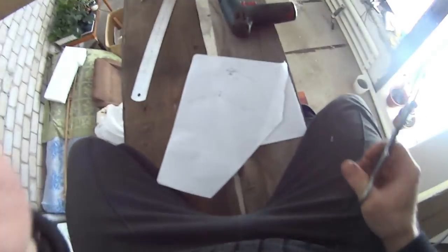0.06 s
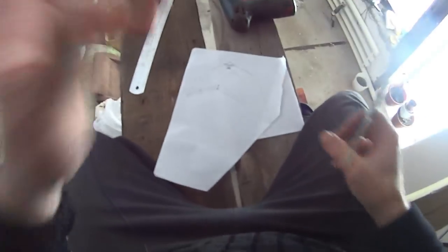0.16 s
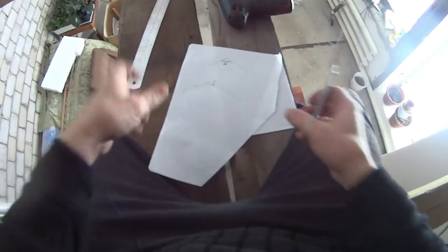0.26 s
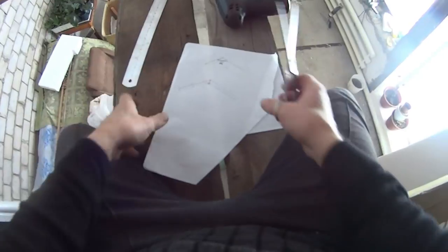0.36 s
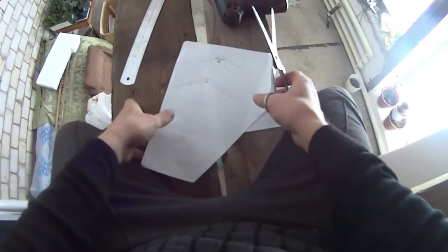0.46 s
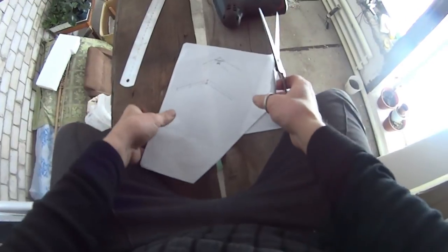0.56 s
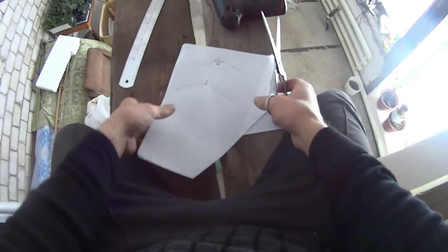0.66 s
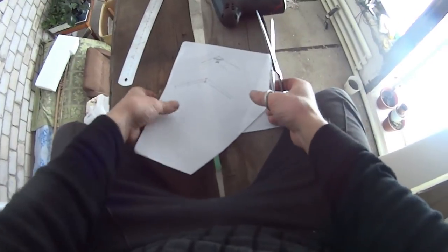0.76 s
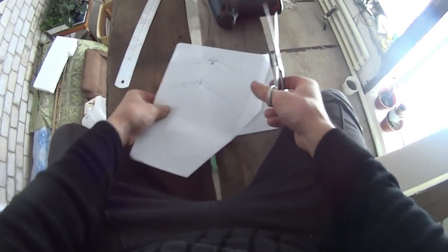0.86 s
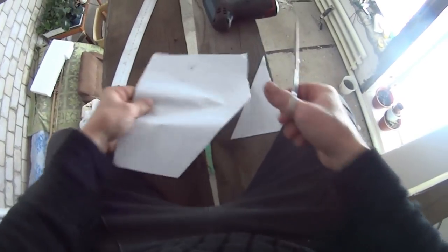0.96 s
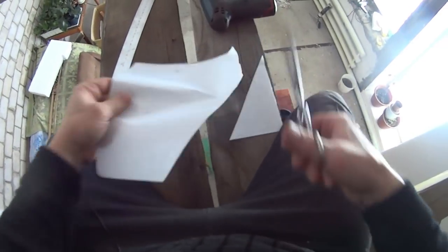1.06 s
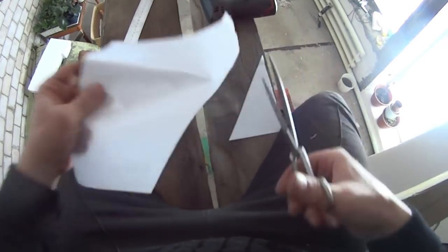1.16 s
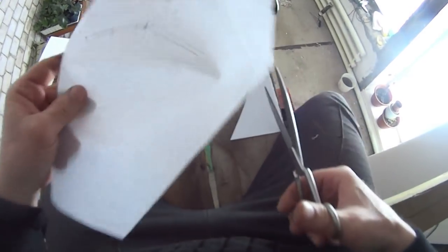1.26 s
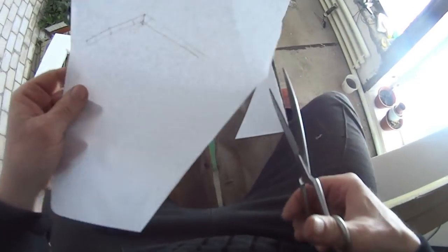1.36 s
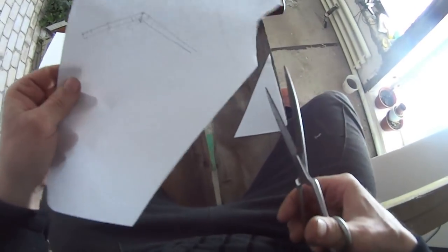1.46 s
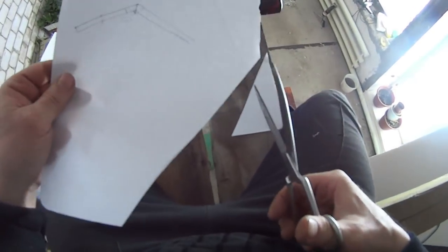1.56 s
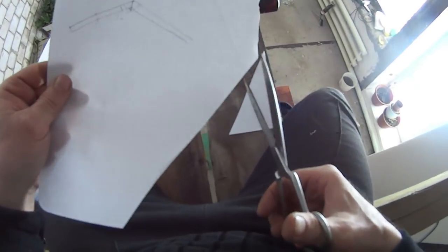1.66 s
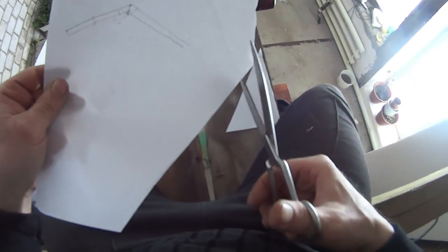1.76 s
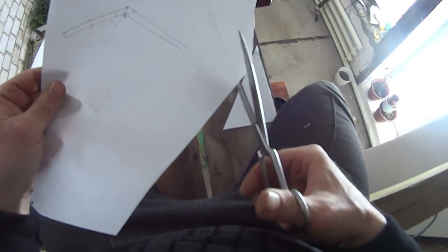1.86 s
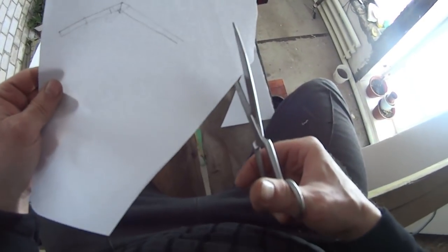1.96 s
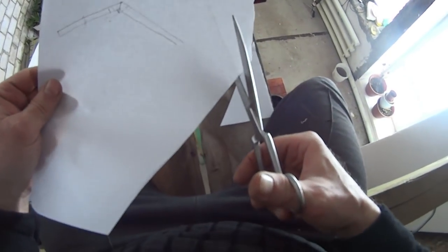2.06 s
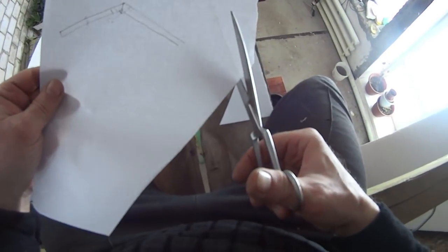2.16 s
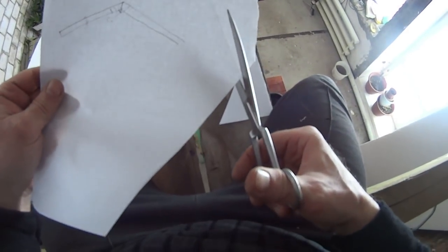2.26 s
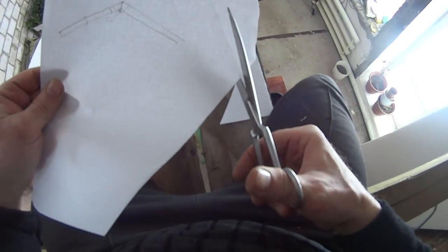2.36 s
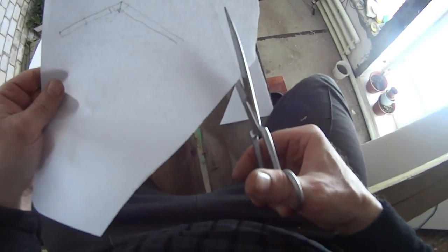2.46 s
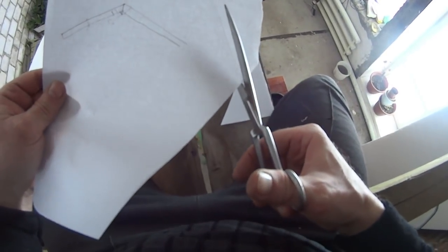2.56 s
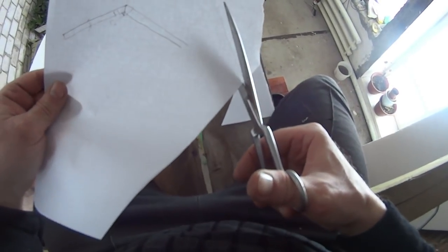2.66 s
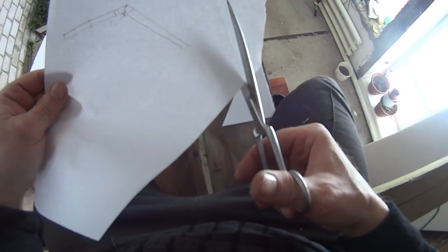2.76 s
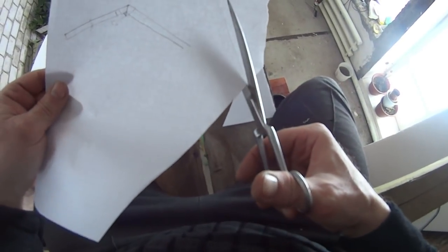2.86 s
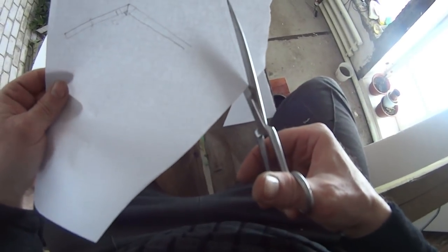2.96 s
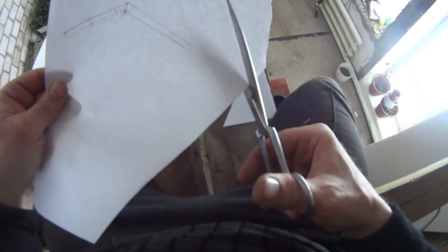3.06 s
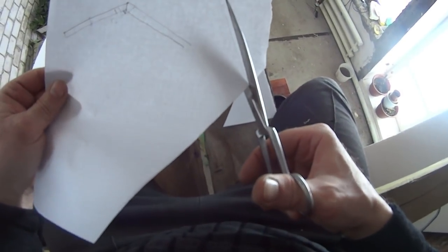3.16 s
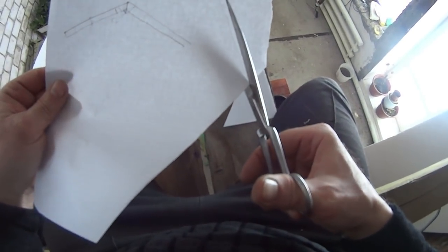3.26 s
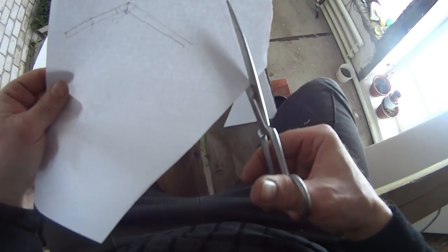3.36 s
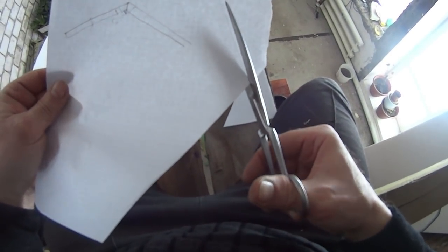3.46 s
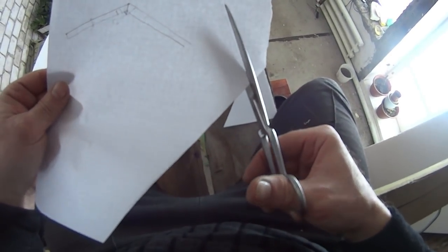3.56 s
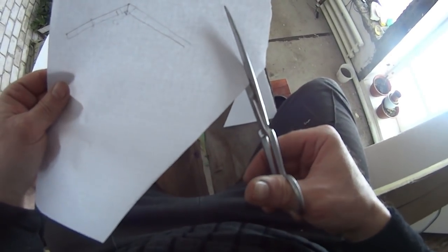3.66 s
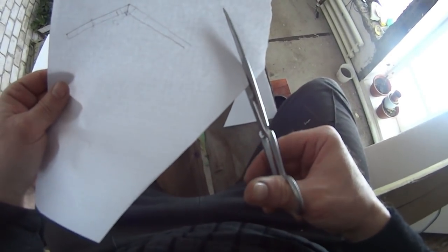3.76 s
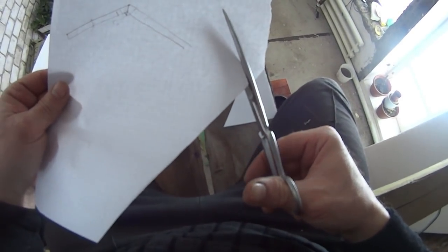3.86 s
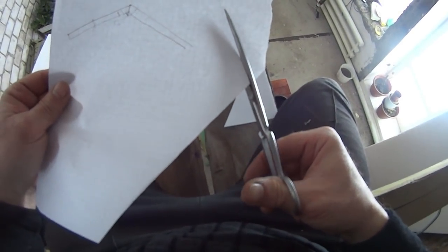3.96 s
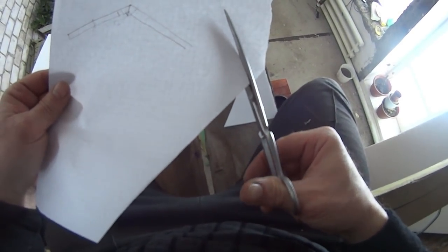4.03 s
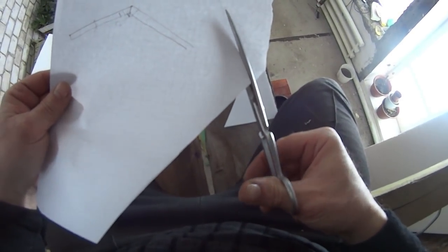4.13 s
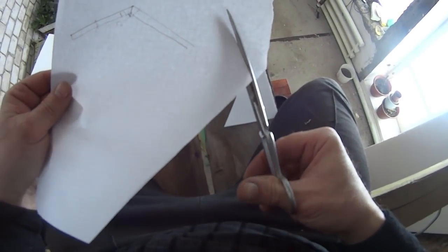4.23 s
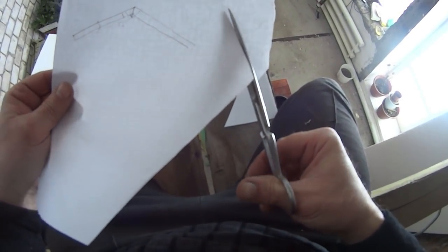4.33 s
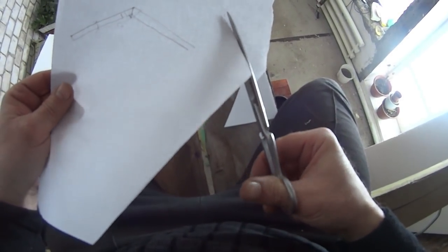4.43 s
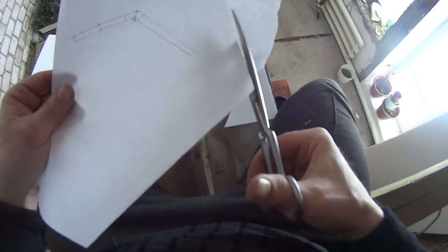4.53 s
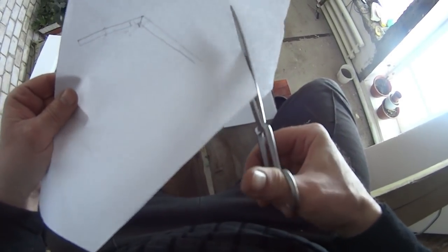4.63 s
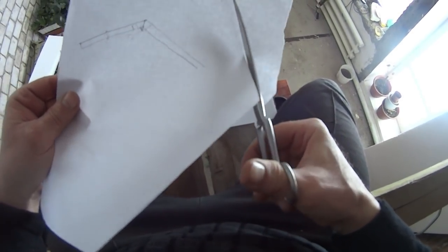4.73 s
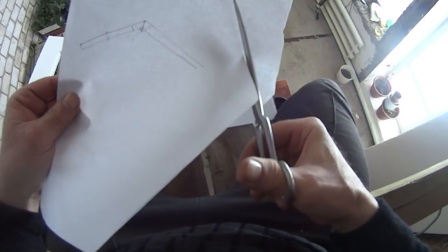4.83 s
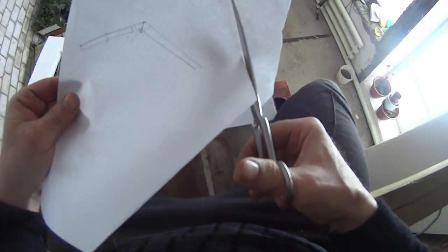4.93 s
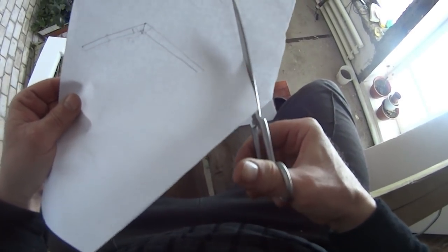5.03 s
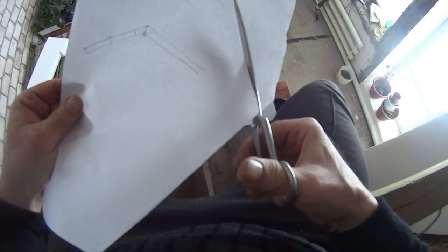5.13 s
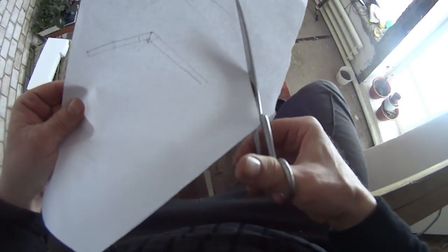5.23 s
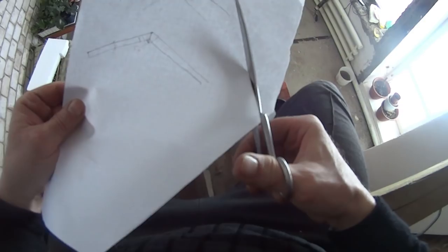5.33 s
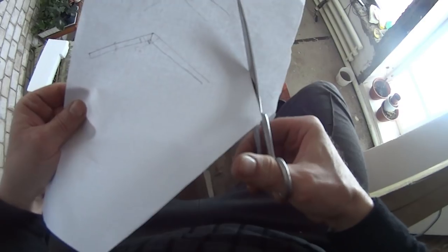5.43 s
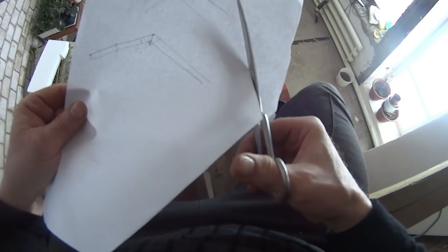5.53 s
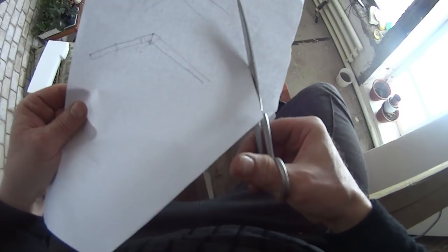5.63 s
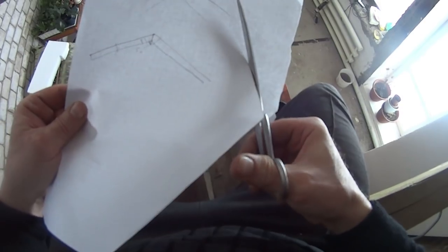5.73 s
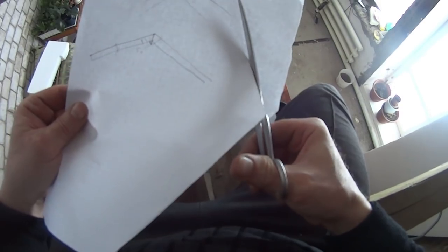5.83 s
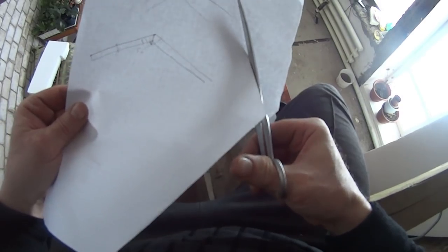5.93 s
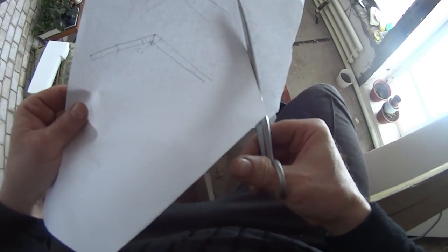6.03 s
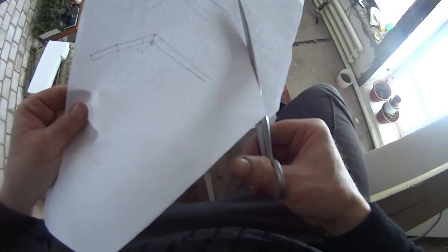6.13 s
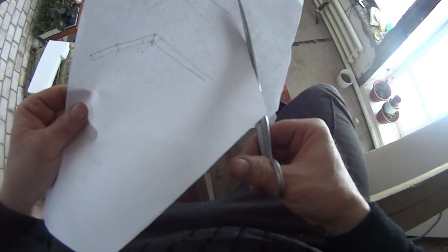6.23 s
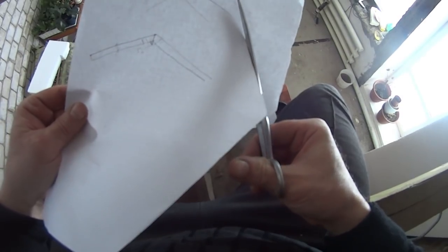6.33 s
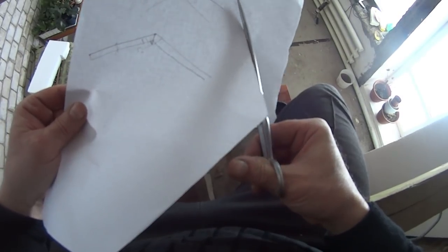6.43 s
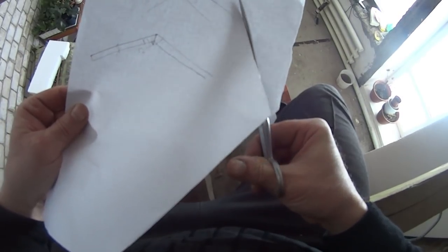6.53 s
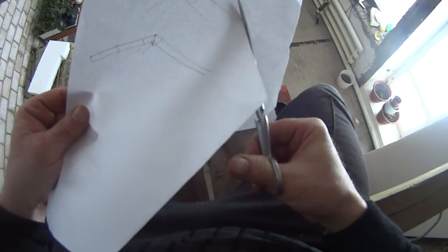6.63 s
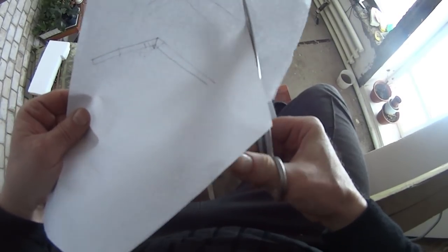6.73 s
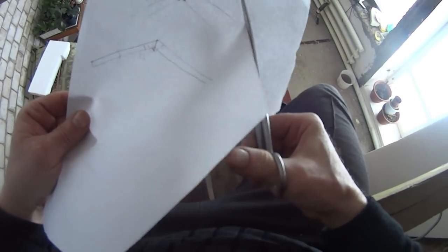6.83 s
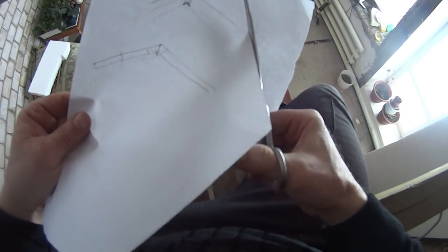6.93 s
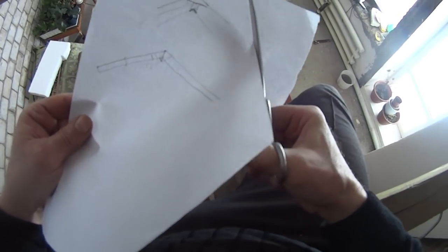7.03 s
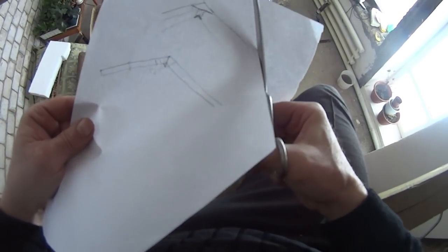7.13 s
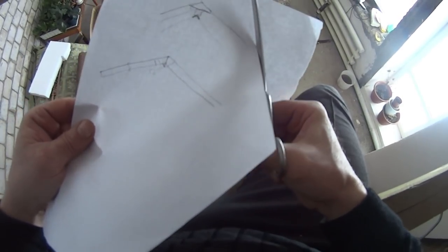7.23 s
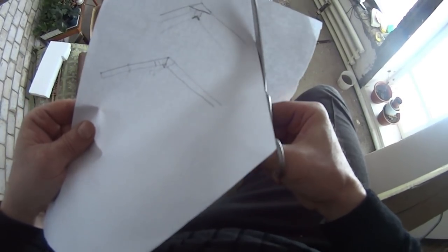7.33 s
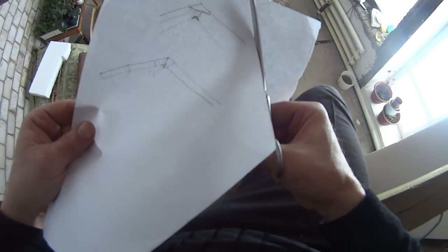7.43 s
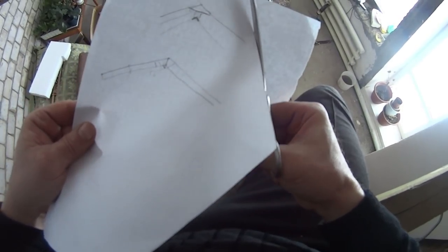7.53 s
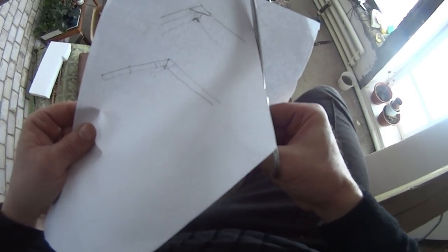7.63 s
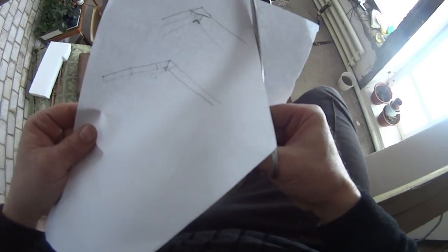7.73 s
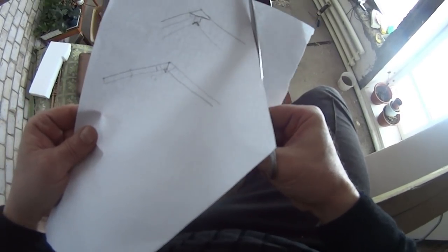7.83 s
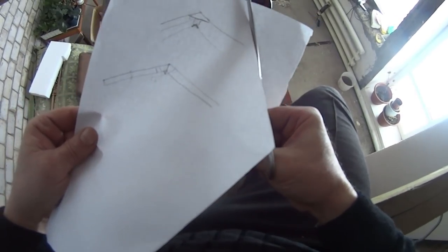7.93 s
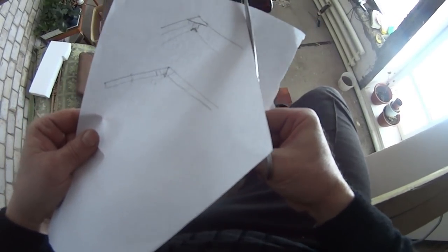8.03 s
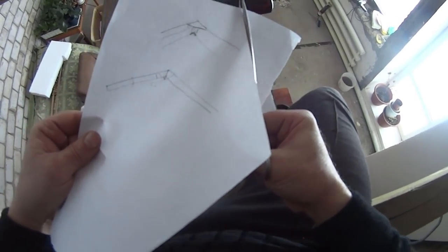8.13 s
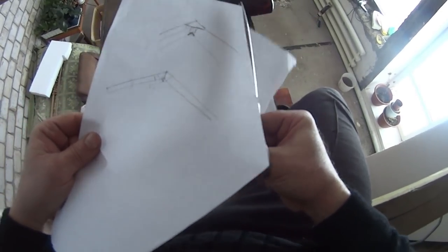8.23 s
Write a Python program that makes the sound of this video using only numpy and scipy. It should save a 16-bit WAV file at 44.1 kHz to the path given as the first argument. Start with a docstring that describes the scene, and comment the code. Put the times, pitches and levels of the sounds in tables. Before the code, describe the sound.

A sheet of paper is picked up with a quick rustle, then cut in slow, crackly scissor strokes over very faint outdoor hiss.

```python
"""On a sheltered porch, scissors creep through a hand-held sheet of paper close to a two-port microphone. A low
hum, the tail of an earlier sound, dies away as a knuckle knocks the housing (ringing modes); the sheet is
lifted off the table and rustles (random fibre clicks through paper resonances). The blades part the fibres in
stick-slip bursts, flips of the sheet hum (dying tones), and once the blades squeal (uneven chatter ringing
them), sinking into a low hum as it ends. Sparse echoes follow, and faint outdoor wash (shaped noise) lies under
it all."""
import sys
import numpy as np
from scipy import signal
from scipy.fft import rfft, irfft, next_fast_len
from scipy.io import wavfile
from scipy.ndimage import uniform_filter1d

SR = 44100
rng = np.random.default_rng(int(sys.argv[2]) if len(sys.argv) > 2 else 0)


def digitize_waveform(pressure):
    """Quantize a signal to 16-bit integers and store it at the path in sys.argv[1].

    Rows of a 2-D input are taken as channels; values are limited to [-1, 1].
    """
    field = np.atleast_2d(pressure).T
    bounded = np.clip(field, -1, 1)
    quanta = np.round(bounded * 32767).astype(np.int16)
    wavfile.write(sys.argv[1], SR, quanta)


def to_linear_factor(level_db):
    """Convert decibel levels (scalar or array-like) to linear amplitude factors."""
    exponent = np.asarray(level_db, float) / 20
    return 10 ** exponent


N = 365412  # samples

# Relative colour of the outdoor wash: [pitch_hz, density_db]
WASH_COLOUR = [(25, -7), (212, -6), (303, 4), (362, -1.5), (603, 0.5), (685, -8.5), (1140, -8),
               (6280, -17.5), (11000, -21.5)]
WASH_DB = -54.5  # rms of the wash as it enters the mix
# Likeness of the wash at the two ports: [pitch_hz, correlation]
WASH_LIKENESS = [(60, 0.92), (340, 0.64), (1890, -0.72), (10600, 0.61)]

# Phase by which the left port leads for a near source: [pitch_hz, lead_rad]
PORT_LEAD = [(100, -.3), (700, -.75), (1500, -.3), (5000, 0)]
# Level of the left port over the right: [pitch_hz, tilt_db]
PORT_TILT = [(40, 1), (500, -3), (1300, -.3)]

# Touches on the housing: [start_s, drive_db, contact_ms]
KNOCKS = [(0.0287, -29, 2.8), (0.0357, -25.5, 0.12), (0.0386, -11, 0.36)]
# Ringing modes of the housing: [pitch_hz, left_db, right_db, t60_s]
HOUSING_MODES = [(210, -12, -30, 0.021), (373, 6.5, 1, 0.0108), (470, -14, -7.5, 0.052),
                 (722, -29, -27, 0.15), (1020, -5, 1, 0.023), (1370, -14, -10.5, 0.057),
                 (1800, 4, -5.5, 0.013), (3870, 2.5, -26, 0.0019)]

# Low dying hums: the first is the tail of an earlier sound, the one at 6.747 s is the squeal sinking low as it
# ends, # the others are flips of the sheet: [start_s, level_db, pitch_hz]
HUMS = [(0.0005, -34, 707), (1.619, -29.5, 434), (4.545, -31.5, 1003), (5.178, -31, 406),
        (6.747, -24.5, 630), (7.996, -25, 514), (8.231, -25.5, 428)]
HUM_RISE_S, HUM_T60_S = 0.0013, 0.067

# Resonances of the squealing blades; the first pitch also sets the chatter: [pitch_hz, width_hz, level_db]
BLADE_MODES = [(1037, 400, 2), (1610, 270, -8), (2190, 280, -6.5), (2560, 98, 2)]
SQUEAL_S, SQUEAL_DB, SQUEAL_HOLD_S = 6.731, -23, 0.017  # start, level and length of the loudest moment
SQUEAL_RISE_DB_PER_S, SQUEAL_FALL_DB_PER_S = 750.5, 1900

# In the paper tables boom_db is relative to level_db, and treble_db tilts the balance of treble over mids;
# bands() trims all three.
# Resonances of paper and blades: [pitch_hz, width_hz, level_db]
SHEET_MODES = [(419, 66, 5.5), (578, 96, -4), (938, 92, -1), (1700, 89, -7.5), (2730, 490, -7),
               (3760, 280, -7.5), (5700, 1300, -18.5), (7600, 800, -28.5)]
SHEET_SHIFT = 0.047  # share by which these resonances sink or rise as the sheet bends
# Relative broad colour of tearing fibres: [pitch_hz, density_db]
FIBRE_COLOUR = [(40, -27), (120, -19), (250, -15), (560, -3.5), (1300, -23), (4800, -31.5), (11000, -34)]
# Clear slips of the blades through the fibres: [centre_s, level_db, length_ms]
SLIPS = [(0.98, -38.5, 6.3), (1.391, -46, 12), (1.49, -37, 9.5), (3.452, -48, 8.3), (3.486, -51, 20),
         (3.522, -54, 6.2), (3.573, -54, 11), (3.633, -56, 7.6), (3.699, -46.5, 10), (3.801, -51.5, 12),
         (3.882, -45.5, 6.7), (3.922, -51, 7.8), (3.972, -46, 6.6), (4.089, -48, 5), (4.267, -40, 6.7),
         (4.291, -41.5, 11.4), (4.314, -36, 12), (5.049, -43.5, 29.7), (5.542, -56.5, 24),
         (5.745, -57, 9.1), (5.795, -48, 6.6), (5.836, -47.5, 21), (5.932, -48, 8), (5.966, -43.5, 16),
         (5.992, -44.5, 13), (6.013, -48.5, 14), (6.078, -40, 12.3), (6.119, -53, 6.6), (6.146, -46.5, 7),
         (6.289, -46.5, 12.5), (6.358, -49.5, 6.7), (6.471, -35, 18.5), (6.505, -37, 28), (7.344, -50, 5.4),
         (7.376, -58, 4.6), (7.402, -47.5, 11), (7.438, -47, 13), (7.471, -49, 15), (7.514, -47, 29),
         (7.552, -50, 9), (7.592, -42, 8.9), (7.618, -43.5, 12), (7.642, -46, 6.8), (7.699, -42, 10.6),
         (7.749, -44, 6.9), (7.782, -45, 27), (7.848, -48, 16), (7.875, -51, 5.5), (7.915, -48, 6),
         (7.935, -43, 24), (7.996, -37.5, 15.3), (8.064, -40, 4.8), (8.106, -40.5, 18.2),
         (8.148, -41.5, 26), (8.18, -39.5, 12), (8.203, -31, 15)]
SLIP_BOOM_DB = -6
# Creases and fibres that let go at one stroke: [start_s, level_db, boom_db, treble_db]
SNAPS = [(0.9215, -24.5, -13, -8), (0.9523, -34, -17, -8), (1.0175, -37, -5, -1), (1.2936, -30, -7.5, -13),
         (3.099, -51.5, 8, -20), (3.5417, -43, -1.5, -4), (3.678, -36, -7.5, -1.5), (4.6448, -29.5, 3, -15),
         (6.4289, -35, -0.5, -6), (6.6293, -35, 8.5, -12), (6.686, -40.5, -1, -5), (6.8571, -43.5, 4, -16),
         (7.4855, -29.5, -21, 1), (7.583, -38, 0, 1), (7.669, -34, -3, 4), (7.7224, -34, 1.5, 2.5)]
# Single tough fibres that part cleanly, with no after-crackle: [start_s, level_db, treble_db]
TICKS = [(0.292, -51, -23), (1.9643, -48, 10), (2.7634, -42, 5), (3.344, -48, -4), (3.684, -45, 2),
         (3.9011, -39, -23.5), (5.0839, -34.5, -17.5), (6.7488, -35, 6), (7.343, -38, 5),
         (7.8274, -32.5, 6), (7.95, -38, 6), (8.249, -31, 4)]
# Fingers and blades dragging over the sheet: [start_s, length_s, level_db, boom_db, treble_db]
RUBS = [(0.003, 0.048, -38.5, -8, -8.5), (0.506, 0.049, -52.5, -7.5, 7), (0.737, 0.095, -53.5, 0.5, 9),
        (0.83, 0.14, -45.5, -1.5, -1.5), (0.9, 0.13, -40.5, -8.5, -0.5), (1.012, 0.053, -42, -7, -4.5),
        (1.085, 0.11, -45.5, -17, 2.5), (1.225, 0.19, -47, -2.5, 1), (1.36, 0.15, -48.5, 4.5, -17),
        (1.55, 0.037, -50, 6, -31), (1.592, 0.02, -56, 10, -28), (1.44, 0.28, -58, 14, -7),
        (4.14, 0.14, -50.5, -14, 1), (4.21, 0.16, -44.5, -1.5, -7), (4.523, 0.07, -38, -3, 0),
        (4.592, 0.058, -40, -3.5, -1.5), (4.64, 0.11, -38, 2.5, -6), (4.785, 0.028, -40, 1.5, -3),
        (5.172, 0.057, -40.5, 3.5, -9.5), (5.235, 0.076, -56.5, 4, -14), (6.704, 0.064, -34.5, -8, -6),
        (6.755, 0.082, -53, 9, -16), (6.858, 0.074, -38.5, -4.5, -4.5), (6.945, 0.15, -42, -6.5, -4),
        (7.04, 0.06, -41.5, -4.5, 1), (7.1, 0.09, -45.5, -3, -5.5), (7.188, 0.025, -43.5, 4, -2.5)]
# Slow closing, where the blades stick and slip: [start_s, length_s, level_db, boom_db, treble_db]
CUTS = [(3.245, 0.5, -54, -4, -4), (3.72, 0.42, -60.5, -5, 2.5), (5.52, 0.43, -56.5, 2, -2),
        (5.88, 0.98, -60, 4, 0.5), (7.23, 0.35, -50, -8, 0), (7.58, 0.53, -62, 1, 7)]
GRIP_S, ARCH_DB, LET_GO_DB_PER_S = 0.0035, 6.5, 550  # a drag catches fast, swells to its middle, dies away
HELD_DB, HELD_BOOM_DB, HELD_TREBLE_DB = -63.5, 1.5, -7  # the sheet merely held

EDGE_HZ = 11030  # upper band limit


def evened(x):
    """Scales to rms 1."""
    return x / np.sqrt(np.mean(x ** 2) + 1e-20)


def read(points, hz):
    """Looks a table up on a log-frequency axis."""
    f, value = np.transpose(points)
    return np.interp(np.log(hz + 1), np.log(f + 1), value)


def causal(gain):
    """Minimum-phase impulse response of a gain given on rfft bins."""
    log_gain = np.log(np.maximum(np.r_[gain, gain[-2:0:-1]], 1e-4))
    return np.fft.ifft(np.exp(np.conj(signal.hilbert(log_gain)))).real[:2048]


def ringing(hz, t60, t):
    """One dying mode."""
    return np.sin(2 * np.pi * hz * t) * to_linear_factor(-60 * t / t60)


def wash():
    """Distant outdoor noise with drifting patches, partly alike at the two ports."""
    frames, hz = N // 256 + 5, np.fft.rfftfreq(1024, 1 / SR)
    a, b, c, d, patches = rng.standard_normal((frames, 513, 5)).T
    patches = evened(uniform_filter1d(uniform_filter1d(patches, 10, 0), 10, 1))
    likeness = np.clip(read(WASH_LIKENESS, hz), -1, 1)[:, None]
    left = a + 1j * b
    right = likeness * left + np.sqrt(1 - likeness ** 2) * (c + 1j * d)
    drift_db = 3 * patches / (1 + hz[:, None] / 1200)  # the far hiss is steadier than the low wash
    spectra = np.array([left, right]) * to_linear_factor(read(WASH_COLOUR, hz)[:, None] + drift_db)
    noise = signal.istft(spectra, nperseg=1024, noverlap=768)[1][:, :N]
    return to_linear_factor(WASH_DB) * evened(noise)


def porch(x):
    """Sparse echoes off table, wall and body, other ones at each port; patterns slowly, steadily trade places."""
    t, out = np.arange(3000) / SR, np.zeros((2, N))
    turn = 3.498 * np.arange(N) / SR  # radians
    for k in range(3):
        hits = rng.random((2, len(t))) < 2500 / SR
        taps = hits * rng.standard_normal((2, len(t))) * to_linear_factor(-60 * t / 0.027)
        taps /= np.linalg.norm(taps, axis=1, keepdims=True)
        share = np.cos(turn + k * np.pi / 3) / np.sqrt(1.5)
        out += signal.oaconvolve((x * share)[None], taps, axes=1)[:, :N]
    return out


def ports(x):
    """The two ports hear a near source with a phase lead and a tilt that depend on pitch."""
    size = next_fast_len(N + 4096)
    hz = np.fft.rfftfreq(size, 1 / SR)
    half = to_linear_factor(read(PORT_TILT, hz) / 2) * np.exp(.5j * read(PORT_LEAD, hz))
    return irfft(rfft(x, size) * np.array([half, 1 / half]), size)[:, :N]


def knock():
    """A soft touch, a tick, then a rap ring the housing's modes and reach the right port first."""
    t, out = np.arange(4000) / SR, np.zeros((2, N))
    for channel, late_s in enumerate([.0003, 0]):
        ring = -sum(to_linear_factor(row[1 + channel]) * ringing(row[0], row[3], t) for row in HOUSING_MODES)
        for start_s, drive_db, contact_ms in KNOCKS:
            contact = signal.windows.hann(int(contact_ms * SR / 1000) + 3)
            rap = np.convolve(ring, contact / contact.sum())
            out[channel, round((start_s + late_s) * SR):][:len(rap)] += to_linear_factor(drive_db) * rap
    return out


def hums():
    """Each low hum swells fast, wobbles around its pitch and rings out."""
    t, out = np.arange(5000) / SR, np.zeros(N + len(HUMS) + SR)
    for start_s, level_db, pitch_hz in HUMS:
        wobble = np.cumsum(rng.standard_normal(len(t))) * .06  # radians
        phase = 2 * np.pi * pitch_hz * t + uniform_filter1d(wobble, size=150)
        swell = np.minimum(t / HUM_RISE_S, 1) * to_linear_factor(level_db - 60 * t / HUM_T60_S)
        out[round(start_s * SR):][:len(t)] += swell * np.sin(phase)
    return out[:N]


def squeal():
    """The edges chatter unevenly about a thousand times a second and ring the blades."""
    t = np.arange(-.018, .035, 1 / SR)  # zero where the loudest moment starts
    rise_db = SQUEAL_RISE_DB_PER_S * np.minimum(t, 0)
    fall_db = SQUEAL_FALL_DB_PER_S * np.maximum(t - SQUEAL_HOLD_S, 0)
    unevenness = 0.9 * uniform_filter1d(rng.standard_normal(len(t)), 60)
    turns = np.cumsum(BLADE_MODES[0][0] * (1 + unevenness)) / SR
    catches = np.diff(np.floor(turns), prepend=0) - np.gradient(turns)  # no steady push remains
    chatter = catches + 0.051 * rng.standard_normal(len(t))
    ring = sum(to_linear_factor(db) * width * ringing(hz, 2.2 / width, t - t[0]) for hz, width, db in BLADE_MODES)
    tone = evened(signal.oaconvolve(chatter, ring)[:len(t)])
    out = np.zeros(N)
    out[round((SQUEAL_S + t[0]) * SR):][:len(t)] = tone * to_linear_factor(SQUEAL_DB + rise_db - fall_db)
    return out


def bands(level_db, boom_db, treble_db):
    """Gains of boom, mids and treble, from a level, an absolute boom level and a treble tilt."""
    mids_db = level_db - 7.0 - treble_db / 2
    high_db = level_db - 4.0 + treble_db / 2
    return to_linear_factor(np.array([boom_db - 2.5, mids_db, high_db]))


def burst(t, length):
    """A flat-topped spindle: the edge tears for a moment, then sticks again."""
    return np.exp(-abs(t / np.where(t < 0, 0.42 * length, 0.66 * length)) ** 3)


def stutter():
    """Stress builds and lets go at uneven but similar gaps."""
    gaps, sizes = rng.standard_normal((600, 2)).T
    at = np.cumsum(.022 * np.exp(.35 * gaps))  # seconds
    inside = at < N / SR
    starts = np.zeros(N)
    starts[(at[inside] * SR).astype(int)] = to_linear_factor(sizes[inside])
    return evened(signal.oaconvolve(starts, burst(np.arange(-999, 1000) / SR, 0.0085), "same"))


def drag(start, length):
    """First sample and envelope of one drag: quick grip, an arch, a steady fade."""
    t = np.arange(0, min(length + 60 / LET_GO_DB_PER_S, N / SR - start - 1 / SR), 1 / SR)
    arch_db = ARCH_DB * (np.sin(np.pi * np.minimum(t / length, 1)) - 1)
    fade_db = -LET_GO_DB_PER_S * np.maximum(t - length, 0)
    return round(start * SR), np.minimum(t / GRIP_S, 1) * to_linear_factor(arch_db + fade_db)


def rubbing():
    """Boom, mids and treble drive of all drags; cuts stutter deeply, plain rustle only wavers."""
    slips = stutter()
    waver, stick = 0.69 + 0.11 * slips, 0.47 + 0.8 * slips
    drive = bands(HELD_DB, HELD_DB + HELD_BOOM_DB, HELD_TREBLE_DB)[:, None] * waver
    for rows, pulse in ((RUBS, waver), (CUTS, stick)):
        for start_s, length_s, level_db, boom_db, treble_db in rows:
            first, shape = drag(start_s, length_s)
            span = slice(first, first + len(shape))
            gains = bands(level_db, level_db + boom_db, treble_db)[:, None]
            drive[:, span] += gains * shape * pulse[span]
    return drive


def tearing():
    """Three-band pushes on the sheet: dense fibre clicks gated by drags and slips, plus single cracks."""
    drive = rubbing()
    # a slip is nearly as bright as the drag it breaks out of
    drag_treble_db = 20 * np.log10(drive[2] / drive[1]) - 3.5
    span = np.arange(-1500, 1500)
    for centre_s, level_db, length_ms in SLIPS:
        centre = round(centre_s * SR)
        gains = bands(level_db, level_db + SLIP_BOOM_DB, drag_treble_db[centre])[:, None]
        drive[:, centre + span] += gains * burst(span / SR, length_ms / 1000)
    cracks, after = np.zeros_like(drive), np.arange(1200)
    for start_s, level_db, boom_db, treble_db in SNAPS:
        start, gains = round(start_s * SR), bands(level_db, level_db + boom_db, treble_db)
        cracks[:, start] += 4.5 * gains  # one hard push, then neighbouring fibres follow
        drive[:, start + after] += gains[:, None] * to_linear_factor(-60 * after / SR / 0.03)
    for start_s, level_db, treble_db in TICKS:
        cracks[1:, round(start_s * SR)] += 6 * bands(level_db, level_db, treble_db)[1:]  # no boom
    clicks = (rng.random(N) < 9000 / SR) * rng.standard_normal(N)
    fibres = clicks * to_linear_factor(2.11 * rng.exponential(1, N).clip(0, 5))  # a few fibres are much tougher
    return drive * evened(fibres) + cracks


def paper():
    """The sheet colours the breaking fibres in boom, mids and treble; its resonances move as it bends."""
    pushes = tearing()
    hz = np.fft.rfftfreq(8192, 1 / SR)
    low, high = 1 / (1 + (hz / 800) ** 6), 1 / (1 + (4800 / (hz + 1)) ** 8)
    shares = (low, (1 - low) * (1 - high), high)
    bend = np.interp(np.arange(N), np.linspace(0, N, num=70), rng.uniform(0, np.pi / 2, size=70))
    out = np.zeros(N)
    # crossfade between sunken and risen resonances
    for scale, weight in ((1 - SHEET_SHIFT, np.cos(bend)), (1 + SHEET_SHIFT, np.sin(bend))):
        peaks = sum(to_linear_factor(db) / np.hypot(1, 2 * (hz - f * scale) / width) for f, width, db in SHEET_MODES)
        colour = to_linear_factor(read(FIBRE_COLOUR, hz)) + peaks
        for push, share in zip(pushes, shares):
            response = causal(colour * share)
            out += signal.oaconvolve(push * weight, response / np.linalg.norm(response))[:N]
    return out


def bending(x):
    """The held sheet keeps changing shape: its colour drifts in patches, which reach the ports a little apart."""
    z = signal.stft(x, nperseg=256, noverlap=192)[2]
    patches = rng.standard_normal((2, *z.shape))
    colour, apart = (evened(uniform_filter1d(uniform_filter1d(p, 5, 0), 16, 1)) for p in patches)
    turn = np.exp(1j * 0.2 * apart)
    spectra = z * to_linear_factor(2.4 * colour) * np.array([turn, 1 / turn])
    return signal.istft(spectra, nperseg=256, noverlap=192)[1][:, :N]


def scene():
    """Paper, blades and hums near the ports, their echoes, the knock and the wash."""
    near = bending(paper()) + squeal() + hums()
    echoes = to_linear_factor(-6.5) * porch(near.mean(0))
    return ports(near + echoes) + knock() + wash()


def roll_off(x):
    """The treble ends steeply here."""
    return signal.sosfilt(signal.butter(12, 11210, fs=SR, output="sos"), x)


def record(dry):
    """Microphone bass roll-off, then a steep band limit."""
    thin = signal.lfilter(*signal.butter(2, 60, "high", fs=SR), dry)
    lowpass = signal.firwin(401, EDGE_HZ, window=("kaiser", 9), fs=SR)
    limited = signal.oaconvolve(thin, lowpass[None], "same")
    return roll_off(limited)


dry = scene()
out = record(dry)
digitize_waveform(out)
```